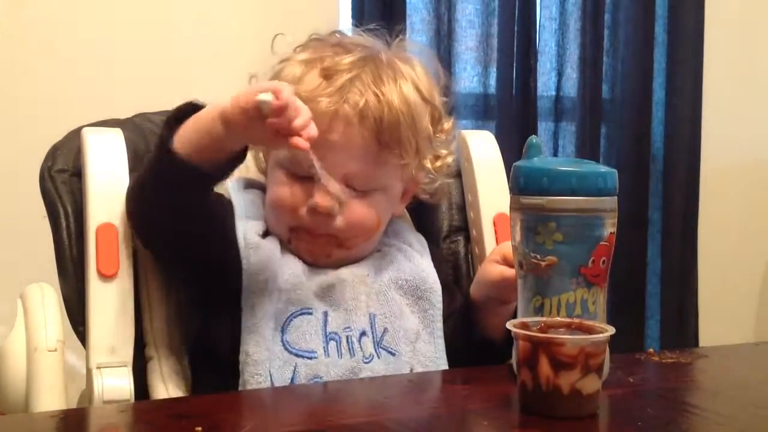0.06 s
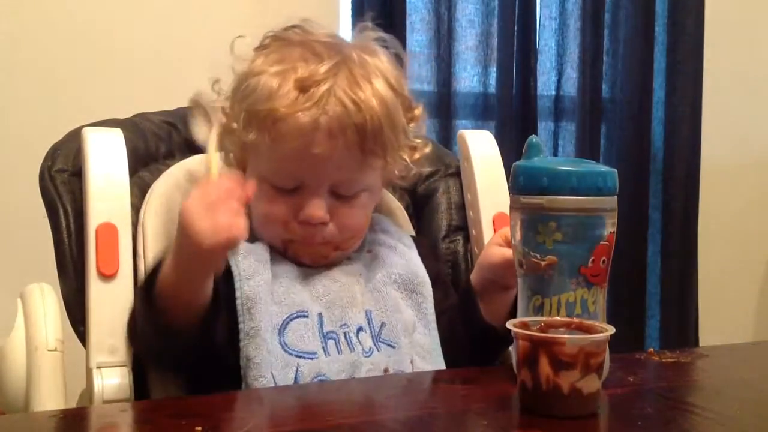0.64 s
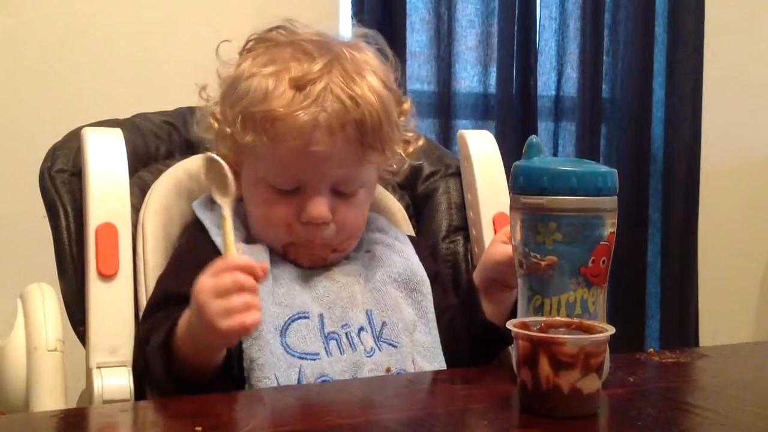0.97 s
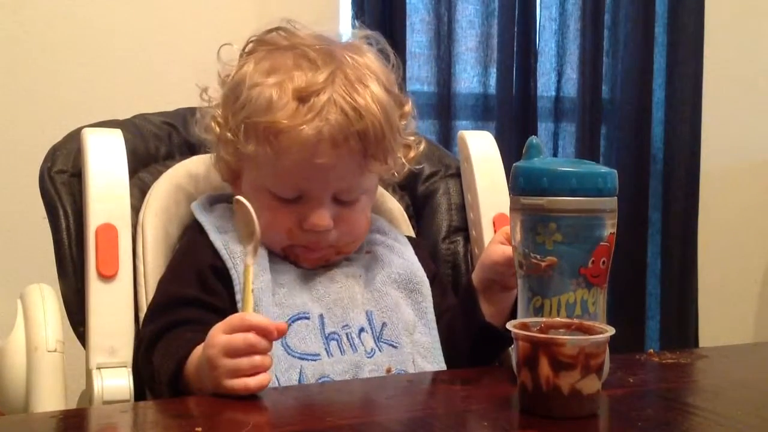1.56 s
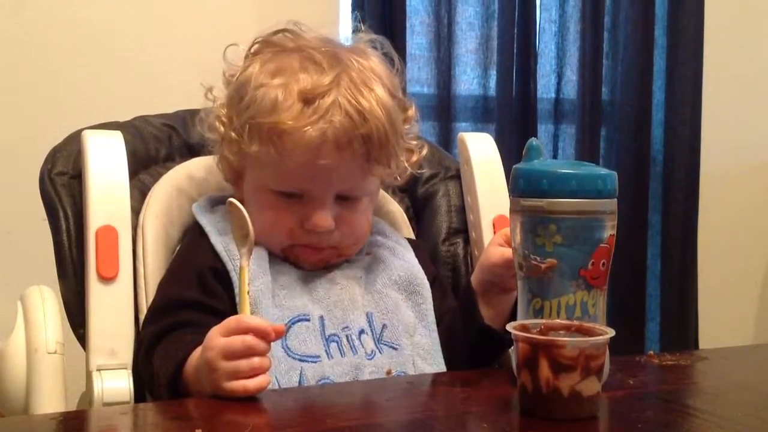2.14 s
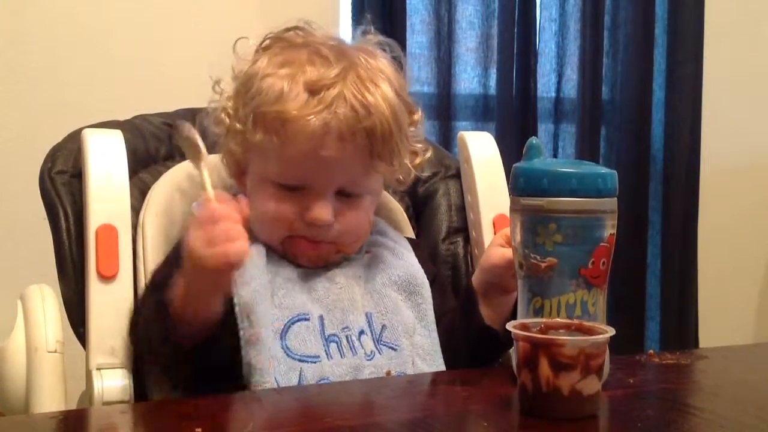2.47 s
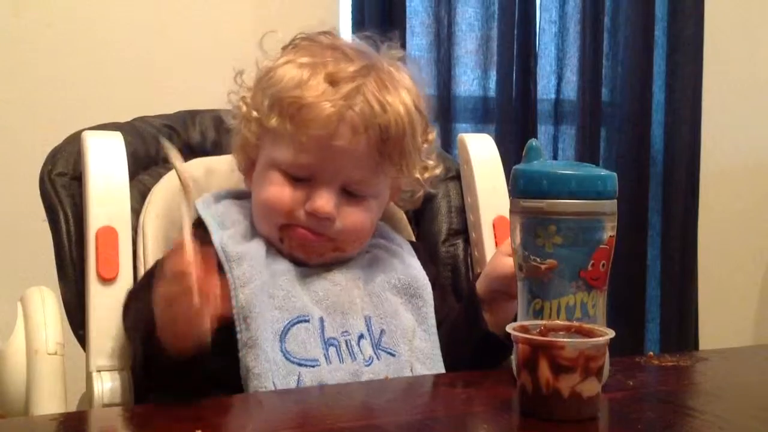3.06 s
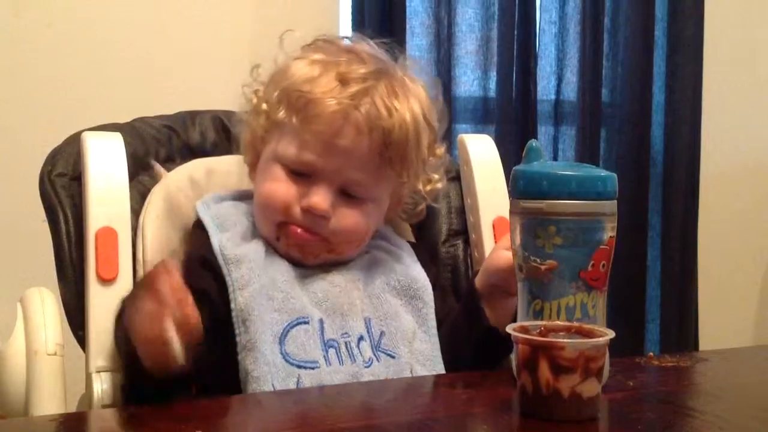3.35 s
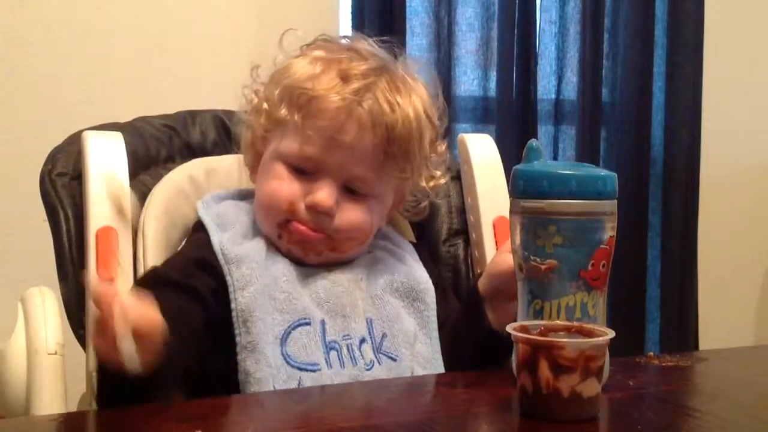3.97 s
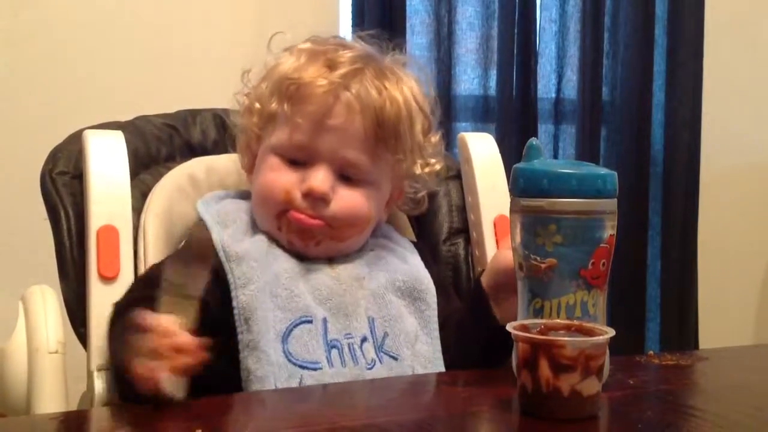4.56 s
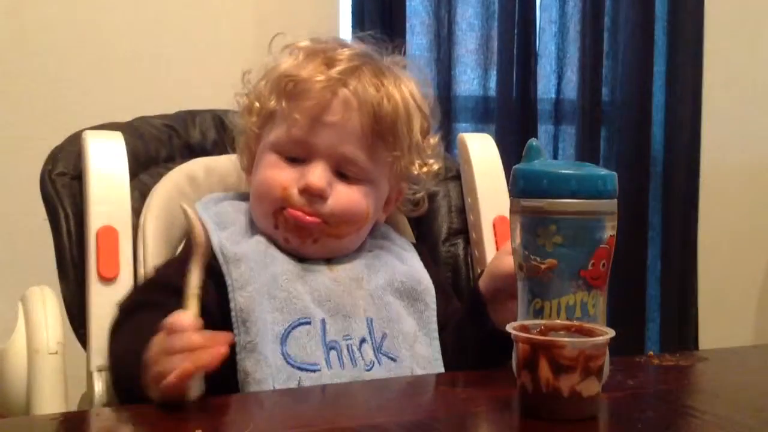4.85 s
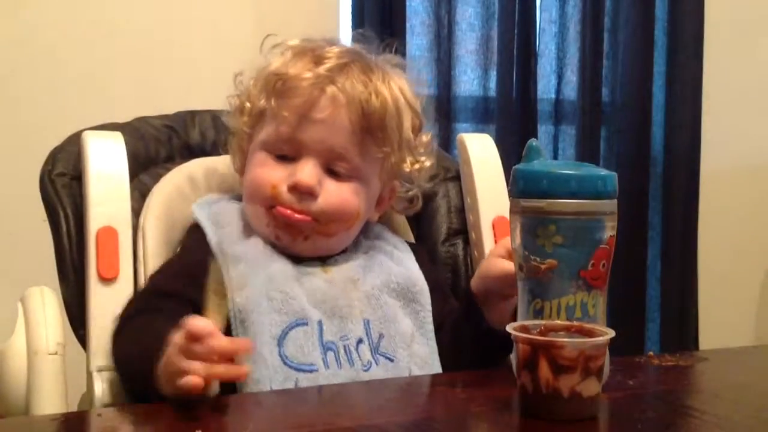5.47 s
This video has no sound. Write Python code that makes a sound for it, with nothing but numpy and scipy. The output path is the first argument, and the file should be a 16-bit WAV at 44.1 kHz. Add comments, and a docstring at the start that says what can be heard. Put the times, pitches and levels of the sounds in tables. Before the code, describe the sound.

A toddler bangs a spoon on a wooden table, one gentle knock and then ten hard ones, in a lively room.

```python
"""A lively room with a wooden table, where a toddler bangs a spoon handle: one gentle knock, later ten
hard ones. Each blow rings the tabletop, ticks and pings the spoon, and the room answers; twice the fist
lands softly too. Before the hard banging come a few faint wet smacks and handling ticks, all over a low
household hum. A limiter flattens the peaks."""
import sys
import numpy as np
from scipy import signal
from scipy.fft import rfft, irfft
from scipy.io import wavfile
from scipy.ndimage import minimum_filter1d

SR = 44100
rng = np.random.default_rng(int(sys.argv[2]) if len(sys.argv) > 2 else 0)


def log_audio(samples):
    """Write samples as a 16-bit WAV file to the path given in sys.argv[1]."""
    # one column per channel
    frames = np.atleast_2d(samples).T
    # limit to full scale, then quantise
    limited = np.clip(frames, -1, 1)
    pcm = np.round(limited * 32767).astype(np.int16)
    wavfile.write(sys.argv[1], SR, pcm)


N = 247886


def amp(db):
    """Decibels to gain."""
    return 10 ** (np.asarray(db) / 20)


def unit_rms(x):
    """Scales to an rms of 1."""
    return x / np.sqrt(np.mean(x ** 2) + 1e-20)


def curve_at(points, hz):
    """Reads a curve of (pitch_hz, value) points on a log-frequency axis."""
    pitches, values = np.transpose(points)
    return np.interp(np.log(hz + 1), np.log(pitches + 1), values)


def bell(hz, centre_hz, octaves):
    """An EQ bell of height 1."""
    return np.exp(-.5 * (np.log2(hz / centre_hz) / octaves) ** 2)


def add(mix, start_s, sound):
    """Lays a sound into the mix."""
    part = mix[round(start_s * SR):][:len(sound)]
    part += sound[:len(part)]


def shaped_noise(spectrum, size):
    """Noise of rms 1 with the given spectrum."""
    gain = amp(curve_at(spectrum, np.fft.rfftfreq(size, 1 / SR)))
    return unit_rms(irfft(rfft(rng.standard_normal(size)) * gain, size))


def resonant_noise(hz, width, size):
    """Noise of rms 1 in one resonance; the width is a share of the pitch."""
    offset = 2 * (np.fft.rfftfreq(size, 1 / SR) / hz - 1) / width
    return unit_rms(irfft(rfft(rng.standard_normal(size)) / (1 + offset ** 2), size))


def equalise(x, spectrum, size=2048):
    """Minimum-phase EQ: nothing sounds ahead of the attack."""
    log_gain = np.log(amp(curve_at(spectrum, abs(np.fft.fftfreq(size, 1 / SR)))))
    taps = np.fft.ifft(np.exp(np.conj(signal.hilbert(log_gain)))).real
    return signal.oaconvolve(x, taps)[:len(x)]


# Colour of the air bed: pitch_hz, level_db
AIR_COLOUR = [(18, -75), (30, -42), (49, -28.5), (86, -24.5), (106, -21), (127, -11), (149, -11.5),
              (345, -8), (526, -17), (649, -18), (937, -24.5), (1040, -23.5), (1960, -27.5), (14800, -32),
              (16000, -53.5)]
# Fader ride on the air bed: time_s, level_db
AIR_RIDE = [(0, -66), (.45, -61.5), (.75, -64), (1.0, -65), (2.1, -66.5), (2.6, -65), (5.6, -62)]
# Partials of the motor hum: pitch_hz, level_db
MOTOR_HUM = [(123.8, -71.5), (188.4, -76), (344.5, -78)]
def room_tone(hum_db=-1):
    """A bed of soft rumble and hiss with the hum of a household motor."""
    t = np.arange(N) / SR
    hum = sum(amp(db) * np.sqrt(2) * np.sin(2 * np.pi * (hz * t + rng.random())) for hz, db in MOTOR_HUM)
    air = amp(np.interp(t, *np.transpose(AIR_RIDE))) * shaped_noise(AIR_COLOUR, N)
    return air + amp(hum_db) * hum


# Reverb tail by band: pitch_hz, t60_s, level_db
REVERB_BANDS = [(78, 1, -20.5), (206, 0.16, 6), (450, 0.55, -2), (693, 0.45, -5), (1188, 0.56, -3.5),
                (1570, 0.58, -8.5), (2880, 0.5, -2.5), (7040, 0.5, -5.5), (15500, 0.27, -2)]
def room_reverb(gap_s=0.0033, build_s=0.0074, spacing=22):
    """Scattered wall reflections fade in after a pre-delay, each band dying at its own speed."""
    taps = np.zeros(SR)
    slots = np.arange(0, SR - spacing, spacing)
    taps[slots + rng.integers(0, spacing, len(slots))] = rng.choice([-1., 1.], len(slots))
    hz, t, spectra = signal.stft(taps, SR, nperseg=256)
    bands = np.array(REVERB_BANDS)
    decay = amp(-60 * t / curve_at(bands[:, :2], hz)[:, None])
    tail = signal.istft(spectra * decay, SR, nperseg=256)[1][:SR]
    tail *= 1 - np.exp(-np.maximum(np.arange(SR) / SR - gap_s, 0) / build_s)
    return equalise(tail / np.linalg.norm(tail), bands[:, ::2])


# Tiny handling ticks: start_s, pitch_hz, level_db
HANDLING_TICKS = [(.809, 1790, -55.5), (1.109, 6000, -56.5), (1.695, 1050, -66), (1.864, 1070, -59),
                  (2.295, 650, -54.5), (2.56, 1670, -58.5)]
# The fist landing softly on the table: start_s, pitch_hz, level_db
FIST_THUDS = [(1.212, 275, -36), (4.860, 172, -34)]
def soft_touches(cues, width, t60_s, rise_s=0.00067):
    """Light contacts, each a dying puff of noise in one resonance."""
    out, t = np.zeros(N), np.arange(SR // 4) / SR
    for start_s, hz, db in cues:
        envelope = amp(db - 60 * t / t60_s) * (1 - np.exp(-t / rise_s))
        add(out, start_s, resonant_noise(hz, width, len(t)) * envelope)
    return out


# Faint wet smacks: start_s, level_db, tilt_db_per_octave
SMACK_CUES = [(0.249, -51.5, -3.5), (.260, -48.5, -1.5), (0.577, -43, -2), (0.591, -44, 4.5),
              (0.608, -47.5, 2)]
# Their tone before the tilt: pitch_hz, level_db
SMACK_EQ = [(300, -37), (700, -4.5), (920, 8), (1350, -2.5), (2000, 11.5), (2500, 3.5), (3000, 4),
            (4000, 3.5), (6500, 4), (10000, -1.5), (15000, -12)]
def wet_smacks(reverb_db=2, grain=0.6, t60_s=.05):
    """Short crackling bursts with a generous reverb send."""
    out, t = np.zeros(N), np.arange(SR // 5) / SR
    for start_s, db, tilt_db in SMACK_CUES:
        crackle = rng.standard_normal(len(t)) * np.exp(grain * rng.standard_normal(len(t)))
        spectrum = [(hz, level + tilt_db * np.log2(hz)) for hz, level in SMACK_EQ]
        add(out, start_s, amp(db - 60 * t / t60_s) * unit_rms(equalise(crackle, spectrum)))
    return out + amp(reverb_db) * signal.fftconvolve(out, room_reverb())[:N]


def late_swell(t, peak_s=.11, spread_s=0.069, level_db=-37.5):
    """A narrow band of noise near 1.5 kHz swells about 0.1 s after each blow."""
    envelope = amp(level_db) * np.exp(-((t - peak_s) / spread_s) ** 2)
    return envelope * resonant_noise(hz=1529, width=0.025, size=len(t))


# Bite of the handle on wood: pitch_hz, level_db
TICK_COLOUR = [(500, -12), (2200, 8), (4000, -7.5), (5000, -11), (6500, -8.5), (8000, -15.5), (10500, -14),
               (12500, -18.5), (15000, -21)]
def handle_tick(t, level_db=-14, t60_s=0.024, slap_s=0.011, slap_db=-12):
    """The hard contact spits a burst of noise, and a near wall slaps it back."""
    tick = amp(level_db - 60 * t / t60_s) * shaped_noise(TICK_COLOUR, len(t))
    add(tick, slap_s, amp(slap_db) * tick)
    return tick


# Ring of the tabletop and what stands on it: pitch_hz, level_db, t60_s
TABLETOP_MODES = [(188, -32.5, 0.06), (243.3, -60, 0.94), (281.7, -34, 0.38), (343.1, -28.5, 0.17),
                  (389.8, -18, 0.11), (436, -33.5, 0.25), (507, -12.5, 0.078), (559.4, -31, 0.37),
                  (600, -28.5, 0.26), (646.6, -10.5, 0.081), (679, -9, 0.07), (734, -13, 0.098),
                  (789, -16, 0.1), (829.7, -8, 0.034), (905, -8.5, 0.043), (1045, -19, 0.031),
                  (1111.5, -2.5, 0.016), (1224, -15, 0.043), (1347, 2, 0.0084), (1356, -10.5, 0.021),
                  (1530, -41, 0.4), (1656.3, 1, 0.02), (1734, -8.5, 0.022), (1866, -8.5, 0.028),
                  (2009, -11, 0.014), (2380, -25.5, 0.023), (3037, -20.5, 0.027), (3130, -53.5, 0.44),
                  (3724, -18, 0.015)]
# Ping of the hand-damped spoon: pitch_hz, level_db, t60_s
SPOON_MODES = [(3730, -40.5, .012), (6500, -28, 0.0081), (9030, -26, 0.0091)]
def struck_ring(modes, t, rise_s, wander=0.0036, uneven_db=0.88):
    """Dying sines build as the blow spreads; each contact point tunes and drives them a little anew."""
    hz, db, t60 = np.transpose(modes)[:, :, None]
    detune, drive = rng.standard_normal((2, len(hz), 1))
    envelopes = amp(db + uneven_db * drive - 60 * t / t60)
    partials = envelopes * np.sin(2 * np.pi * hz * (1 + wander * detune) * t)
    return partials.sum(0) * (1 - np.exp(-t / rise_s))


def contact_eq(hardness, clatter_db, corner_hz=1200):
    """A hard contact stays bright, a soft one gives a dull woody knock, a skewed one clatters."""
    hz = np.geomspace(50, 16000, 60)
    treble = hardness * np.log2(np.maximum(hz / corner_hz, 1))
    knock = (-0.1 - 0.73 * hardness) * bell(hz, centre_hz=950, octaves=0.32)
    clatter = clatter_db * bell(hz, centre_hz=4200, octaves=.35)
    return np.column_stack([hz, treble + knock + clatter])


# The crack that the whole tabletop throws into the room: pitch_hz, level_db
CRACK_COLOUR = [(200, -16.5), (500, -3), (1200, 9.5), (2300, 5), (3200, -5.5), (4300, -8.5), (5100, -15.5),
                (7000, -12), (8200, -19), (10500, -16.5), (12500, -25.5), (15000, -19)]
# Spoon hits: start_s, force_db, hardness_db_per_octave, clatter_db, ping_db
SPOON_HITS = [(1.2087, -9, -4.5, -1.5, -1), (2.6492, -1.5, -1.34, 4, -2.5), (2.9167, -0.54, -1, 3.5, -1),
              (3.2445, -0.86, -2, 2.5, -5), (3.5505, -1.5, -2, 0, -5), (3.83, -1.5, -0.44, -3.5, 0),
              (4.1673, -1.5, -0.8, 0, -1), (4.4983, 0, -1.76, 3, 4.5), (4.8398, 0.06, -1.5, 1, 3.5),
              (5.1685, 0.5, -0.4, 5.5, 0), (5.4784, -0.6, -0.8, 1, 1)]
def spoon_bangs(table_db=6, spoon_db=4, crack_db=12, reverb_db=-4, drift_rad=0.32, room_per_force=0.51):
    """Each blow rings table and spoon; the hand shifts, so the reflections drift from hit to hit."""
    out, t = np.zeros(N), np.arange(SR // 2) / SR
    reverb_a, reverb_b = room_reverb(), room_reverb()
    crack = amp(crack_db) * equalise(signal.unit_impulse(len(t)), CRACK_COLOUR)
    for k, (start_s, force_db, hardness, clatter_db, ping_db) in enumerate(SPOON_HITS):
        table = amp(table_db) * struck_ring(TABLETOP_MODES, t, rise_s=0.0027)
        spoon = amp(spoon_db + ping_db) * struck_ring(SPOON_MODES, t, rise_s=0.00023)
        tick = handle_tick(t)
        reverb = np.cos(k * drift_rad) * reverb_a + np.sin(k * drift_rad) * reverb_b
        wet = amp(reverb_db) * signal.fftconvolve(table + spoon, reverb)
        add(wet, 0, signal.fftconvolve(crack, room_reverb()))  # short waves scatter anew on every hit
        add(wet, 0, late_swell(t))
        # harder blows get a louder room tail relative to their attack
        hit = amp(room_per_force * force_db) * wet
        add(hit, 0, table + spoon + tick)
        add(out, start_s, amp(force_db) * equalise(hit, contact_eq(hardness, clatter_db)))
    return out


def scene(low_cut_hz=115):
    """The mono mix; the table gets a low cut, as it radiates little deep bass."""
    low_cut = signal.butter(3, low_cut_hz, "highpass", fs=SR, output="sos")
    table = spoon_bangs() + soft_touches(FIST_THUDS, width=0.46, t60_s=.3)
    small_sounds = wet_smacks() + soft_touches(HANDLING_TICKS, width=0.29, t60_s=0.045)
    return (room_tone() + small_sounds + signal.sosfilt(low_cut, table))[None]


def record(dry, limit_db=-3, hold_s=0.048, release_db_per_s=70, attack_s=0.0017, high_cut_hz=15400):
    """A limiter ducks each peak, holds and releases; a lopsided soft clip and a high cut follow."""
    x = dry[0]
    over_db = np.maximum(20 * np.log10(abs(x) + 1e-9) - limit_db, 0)
    half_hold = int(hold_s * SR / 2)
    held_db = -minimum_filter1d(-over_db, 2 * half_hold + 1, origin=half_hold)
    release_db = release_db_per_s * np.arange(N) / SR
    duck_db = np.maximum.accumulate(held_db + release_db) - release_db
    lag = np.exp(-1 / (attack_s * SR))
    limited = x * amp(-signal.lfilter([1 - lag], [1, -lag], duck_db))
    ceiling = np.where(limited < 0, .57, .75)  # the negative side clips sooner
    clipped = limited / (1 + (limited / ceiling) ** 6) ** (1 / 6)
    high_cut = signal.firwin(255, high_cut_hz, window=("kaiser", 9), fs=SR)
    return signal.oaconvolve(clipped, high_cut, "same")[None]


dry = scene()
out = record(dry)
log_audio(out)
```